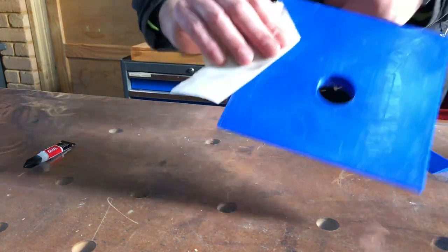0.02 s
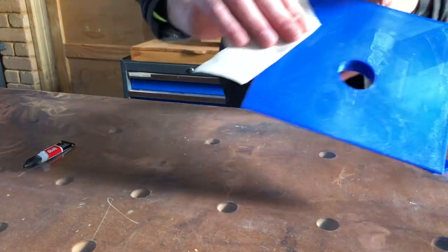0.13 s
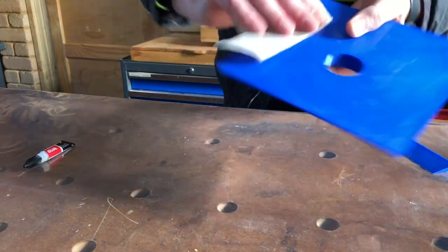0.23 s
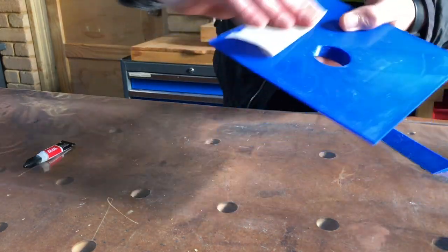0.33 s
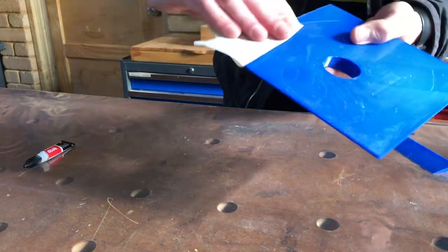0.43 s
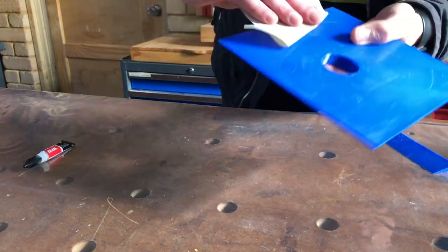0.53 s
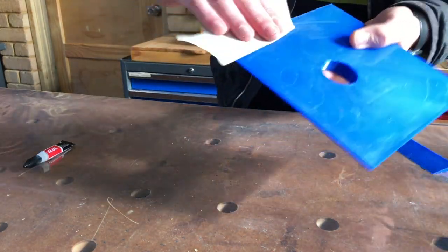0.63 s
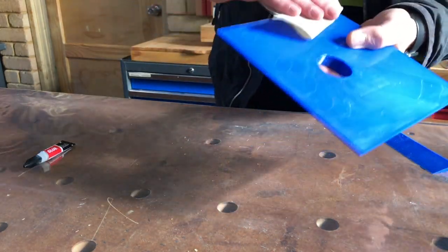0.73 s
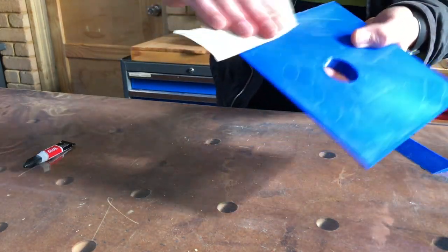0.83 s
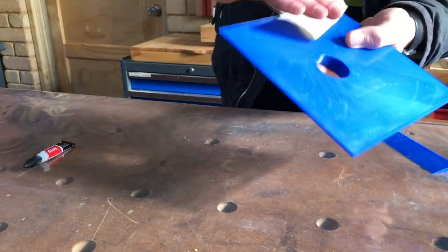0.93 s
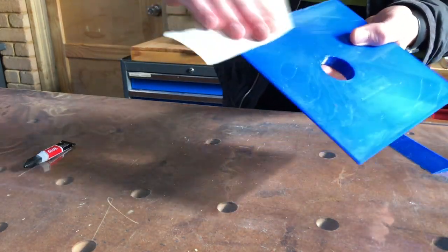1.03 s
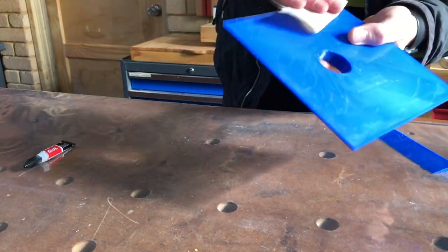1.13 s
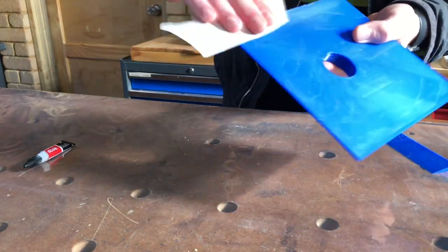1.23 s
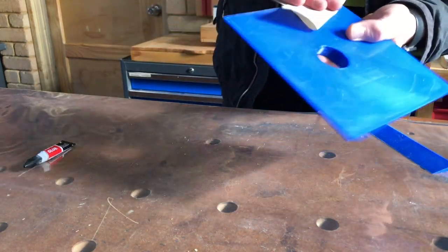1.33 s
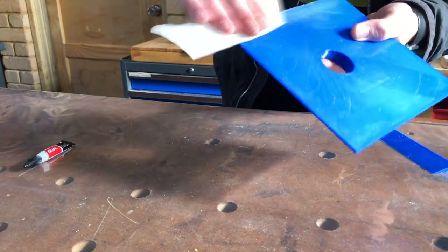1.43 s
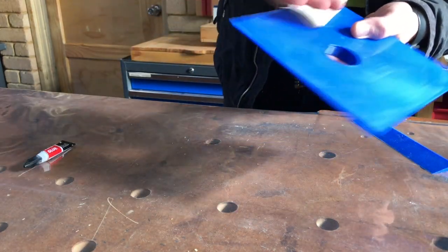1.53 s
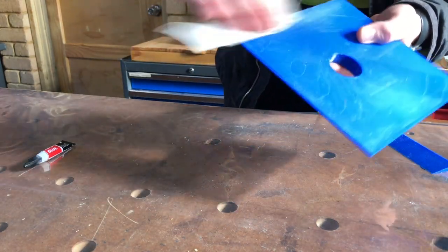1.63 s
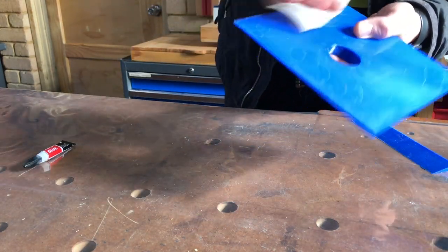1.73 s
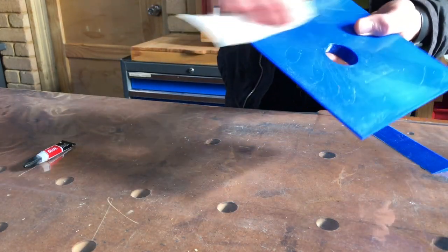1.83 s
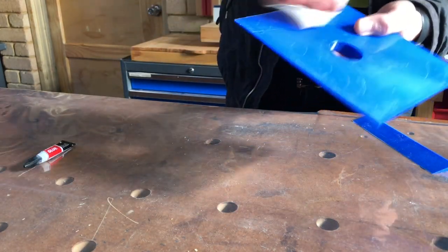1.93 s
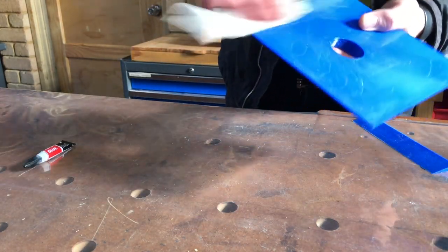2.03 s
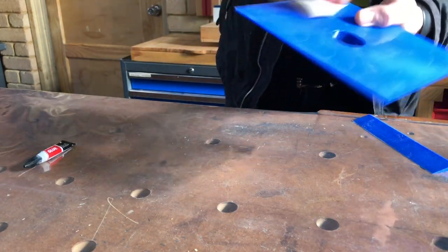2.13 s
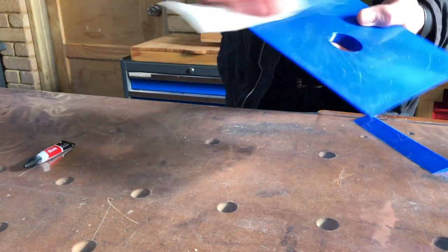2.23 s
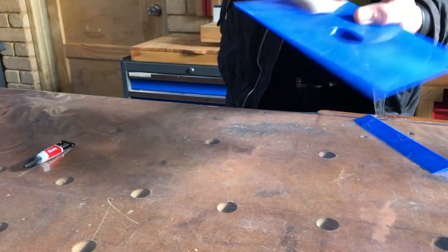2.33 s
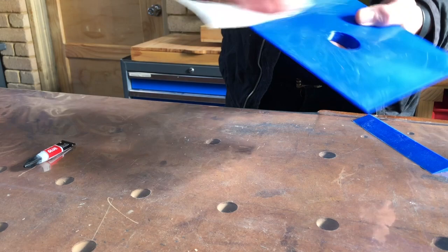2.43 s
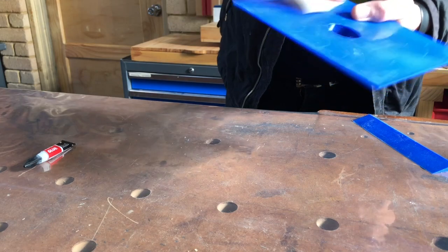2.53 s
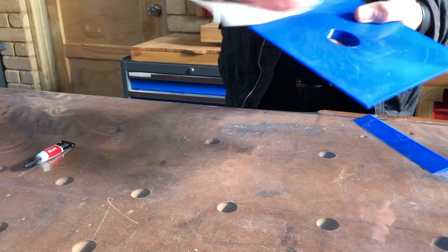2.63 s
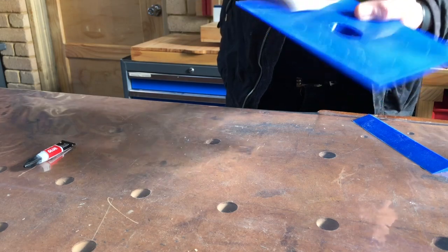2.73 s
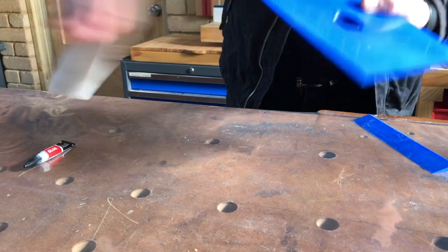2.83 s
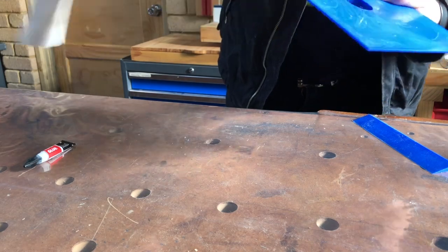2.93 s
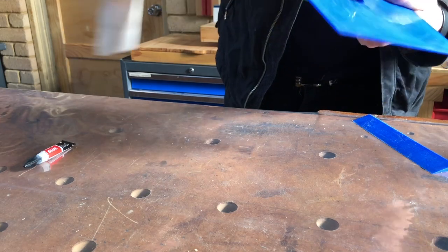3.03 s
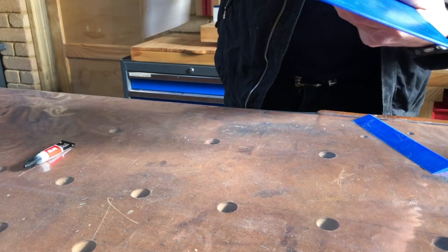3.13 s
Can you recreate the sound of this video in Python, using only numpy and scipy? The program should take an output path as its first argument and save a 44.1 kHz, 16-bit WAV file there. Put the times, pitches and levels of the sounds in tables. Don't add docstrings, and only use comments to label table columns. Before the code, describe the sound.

Sandpaper rubbed quickly by hand back and forth on a hard plastic plate, bright and raspy

```python
import sys
import numpy as np
from scipy import signal
from scipy.fft import rfft, irfft
from scipy.io import wavfile
from scipy.ndimage import uniform_filter1d

SR = 44100
rng = np.random.default_rng(int(sys.argv[2]) if len(sys.argv) > 2 else 0)


def magnitude_from_level(level_db):
    exponent = np.asarray(level_db, float) / 20
    return 10 ** exponent


def waveform_to_disk(signal):
    frames = np.transpose(np.atleast_2d(signal))
    scaled = np.clip(frames, -1, 1) * 32767
    samples = np.round(scaled).astype(np.int16)
    wavfile.write(sys.argv[1], SR, samples)


N = 138915


def evened(x):
    return x / np.sqrt(np.mean(x ** 2) + 1e-20)


def drift(noise, size):
    return evened(uniform_filter1d(uniform_filter1d(noise, size=size), size=size))


def read(points, hz):
    f, value = np.transpose(points)
    return np.interp(np.log(hz + 1), np.log(f + 1), value)


def curve(points, column=1):
    return np.interp(np.arange(N) / SR, [p[0] for p in points], [p[column] for p in points])


def colour(x, points):
    return irfft(rfft(x) * magnitude_from_level(read(points, np.fft.rfftfreq(N, 1 / SR))), N)


def highpass(x, order, hz):
    return signal.sosfilt(signal.butter(order, hz, "high", fs=SR, output="sos"), x)


def add(mix, s, sound):
    part = mix[round(s * SR):][:len(sound)]
    part += sound[:len(part)]


def resonate(x, hz, width):
    turn = np.exp(2j * np.pi * np.cumsum(hz * np.ones(len(x))) / SR)
    r = np.exp(-np.pi * abs(width) / SR)
    return 2 * (turn * signal.lfilter([1 - r], [1, -r], x / turn)).real


def hum_band(x, hz, width):
    return evened(resonate(resonate(x, hz, width), hz, width))


def background():
    # f/Hz, level/dB
    air_colour = [(40, -35), (80, 4), (180, -9.5), (400, -5), (1000, -4.5), (3000, -10.5), (8000, -18),
                  (16000, -33)]
    # t/s, level/dB
    air_level = [(0, -57.5), (.09, -63), (.18, -56.5), (.5, -65), (2.9, -63.5), (3.15, -76)]
    # t/s, f/Hz, first line level/dB, second line level/dB
    motor = [(0, 87.3, -73, -64.5), (.17, 88, -61, -67), (.5, 89.14, -64.5, -76.5), (.86, 88.86, -84, -76),
             (1.12, 90.2, -62, -73.5), (1.33, 89.98, -78, -80.5), (1.55, 91.14, -69.5, -79),
             (2.3, 93.03, -81.5, -84.5), (2.9, 95, -77.5, -80), (3.15, 97.6, -71, -75)]
    a, b, c = rng.standard_normal((3, N))
    air = np.array([colour(a, air_colour), colour(b, air_colour)])
    air = magnitude_from_level(curve(air_level)) * air / np.std(air[0])
    hz = curve(motor)
    for k in (1, 2):
        tone = np.sqrt(2) * np.sin(2 * np.pi * k * np.cumsum(hz) / SR)
        line = tone + 0.5 * evened(resonate(c, k * hz, 2.6))
        air[0] += magnitude_from_level(curve(motor, column=k + 1)) * line
    return air


def paper_snaps():
    # t/s, level/dB, lowest f/Hz, time to fall 60 dB/s
    snaps = [(.05, -66, 11700, .012), (.066, -70, 8500, .01), (.08, -67, 11500, .012),
             (0.098, -33, 1370, 0.012), (0.1014, -45, 2320, 0.02), (.137, -64, 11000, .015),
             (2.838, -47, 700, 0.012), (2.833, -47, 2500, 0.034)]
    out, t = np.zeros(N), np.arange(4000) / SR
    for s, db, hz, t60 in snaps:
        burst = highpass(rng.standard_normal(len(t)), 4, hz)
        ring = 8.7 * resonate(burst, 1.44 * hz, 0.51 * hz)
        add(out, s, magnitude_from_level(db - 60 * t / t60) * (burst + ring) * np.minimum(t / 0.00023, 1))
    return out


def finger_knocks():
    # t/s, level/dB, f/Hz, time to fall 60 dB/s
    knocks = [(0.194, -35, 219, 0.06), (.203, -33, 290, 0.029), (.225, -40, 760, 0.11),
              (1.29, -46, 740, 0.066), (1.49, -46, 741.2, .05), (0.097, -40, 507, 0.064),
              (.599, -39, 706, 0.018), (.797, -62, 580, 0.018), (1.196, -48, 503, 0.037),
              (1.393, -50, 490, 0.037), (1.578, -48, 397.3, 0.024), (1.66, -43, 797.6, 0.08),
              (1.763, -37.5, 800, 0.037), (2.07, -42, 743, 0.073), (2.365, -53, 346, 0.046),
              (2.834, -42, 528.7, 0.047), (2.879, -44.5, 312.4, 0.045), (3.136, -46, 295, 0.027),
              (0.411, -45, 516, 0.06)]
    out, t = np.zeros(N), np.arange(4000) / SR
    for s, db, hz, t60 in knocks:
        swing = np.sin(2 * np.pi * hz * t) * min(250 / hz, 1)
        puff = hz / 600 * hum_band(rng.standard_normal(len(t)), 1.58 * hz, 2.0 * hz)
        rise_s = 0.0073 if hz > 730 else 0.0024
        add(out, s, magnitude_from_level(db - 60 * t / t60) * (swing + puff) * np.minimum(t / rise_s, 1))
    return out


def hand():
    # start t/s, length/s, pressure level/dB, ridge f/Hz at full speed
    strokes = [(.21, 0.13, -31, 1420), (.354, 0.108, -30.5, 1420), (.499, 0.066, -26.5, 1695),
               (.598, 0.081, -29, 1613), (.696, 0.076, -25, 2450), (.8, 0.087, -27, 2508),
               (.9, 0.076, -25.5, 2695), (1.002, 0.082, -27.5, 3050), (1.099, 0.073, -26, 3157),
               (1.201, 0.084, -28, 3055), (1.297, 0.067, -26.5, 3153), (1.392, 0.078, -27.5, 3500),
               (1.484, 0.068, -26.5, 3685), (1.579, 0.075, -28, 3710), (1.673, 0.074, -28, 3530),
               (1.765, 0.084, -28, 3500), (1.863, 0.079, -26, 3592), (1.965, 0.089, -28, 3584),
               (2.066, 0.08, -26.5, 4050), (2.166, 0.094, -28, 3706), (2.272, 0.076, -26.5, 4150),
               (2.366, 0.084, -28, 3860), (2.47, 0.071, -26.5, 3828), (2.563, 0.083, -28.5, 3800),
               (2.661, 0.077, -26.5, 3600), (2.759, 0.075, -27.5, 4924)]
    # fastest t/s, speed at start/share, speed at end/share
    arches = [(.3, 0.96, .95), (.4, 0.85, 0.88), (.53, 0.73, 0.75), (.632, 0.49, .5), (.74, .6, .45),
              (.84, 0.61, .7), (.935, 0.59, .5), (1.062, .64, .88), (1.142, 0.71, 0.53), (1.236, .5, .75),
              (1.335, 0.74, 0.44), (1.425, 0.46, 0.77), (1.522, .75, 0.44), (1.617, 0.41, .8),
              (1.713, 0.71, 0.5), (1.802, 0.48, .75), (1.91, 0.63, 0.46), (2.005, .45, .55),
              (2.113, 0.66, 0.54), (2.2, .48, 0.74), (2.315, 0.51, 0.41), (2.403, .42, 0.59),
              (2.515, 0.63, 0.42), (2.6, .36, .45), (2.705, .65, .48), (2.83, 0.35, .98)]
    # level/dB, clearest t/s, half length/s
    catches = [(-12, 0.309, .02), (-14, 0.37, .05), (-13, 0.486, 0.023), (-12, 0.651, 0.022),
               (-27, 0.73, .03), (-12.5, .845, 0.023), (-21, .935, 0.017), (-8, 1.044, 0.021),
               (-10.5, 1.148, .018), (-10, 1.22, 0.016), (-10.5, 1.338, 0.035), (-9.5, 1.412, 0.027),
               (-9.5, 1.532, 0.028), (-9.5, 1.595, 0.027), (-6, 1.712, 0.01714), (-9.5, 1.788, 0.018),
               (-11, 1.912, 0.06), (-11.5, 1.99, .035), (-6.5, 2.112, 0.0087), (-11, 2.197, 0.021),
               (-7.5, 2.318, 0.018), (-8, 2.4, 0.023), (-11.5, 2.505, 0.0239), (-9, 2.604, 0.03),
               (-14, 2.708, .025), (-3.5, 2.804, 0.018)]
    # rise/s, fall/s, lean from start to end/dB
    pull, push = (.022, .012, 1.3), (.007, .032, -3.5)
    opening, closing = (.012, .01, -2.5), (0.00501, 0.013, -0.74)
    pointed, loose = 1.2, 0.38
    slowest = 0.377
    gain, speed, hz, catch = np.zeros((4, N))
    for k, (s, length, db, top_hz) in enumerate(strokes):
        shape = push if k % 2 else pull
        if k < 2:
            shape = opening
        if k == len(strokes) - 1:
            shape = closing
        rise, fall, lean_db = shape
        top, first, final = arches[k]
        catch_db, clear, half = catches[k]
        t = np.arange(0, length + (rise + fall) / 2, 1 / SR)
        now = t + s - rise / 2
        edge = np.clip(t / rise, 0, 1) * np.clip((t[-1] - t) / fall, 0, 1)
        press = edge * magnitude_from_level(db + lean_db * (t / t[-1] - .5) * 2)
        ends = np.where(now < top, first, final)
        angle = np.interp(now, [now[0], min(top, now[-2]), now[-1]], [0, np.pi / 2, np.pi])
        v = ends + (1 - ends) * abs(np.sin(angle)) ** pointed
        sing = magnitude_from_level(catch_db) * (loose + (1 - loose) * np.exp(-.5 * ((now - clear) / half) ** 2))
        for mix, part in zip((gain, speed, hz, catch), (press, v, v * top_hz, sing)):
            span = mix[round(now[0] * SR):][:len(t)]
            span[:] = np.maximum(span, part)
    return gain, np.clip(speed, slowest, 1), np.clip(hz, 300, 5200), catch


def patchy(x):
    z = signal.stft(x, nperseg=256)[2]
    patch = uniform_filter1d(rng.standard_normal(z.shape), size=7, axis=0)
    patch = evened(uniform_filter1d(patch, size=3, axis=1))
    return signal.istft(z * magnitude_from_level(2.5 * patch), nperseg=256)[1][:N]


def grit_crackle(grains, speed, pace):
    # f/Hz, level/dB
    click_colour = [(150, -73), (500, -29.5), (1300, -29), (2300, -6), (6170, -5.5), (10900, -1.5),
                    (13000, -7.5), (16000, -6)]
    # f/Hz, width/Hz, level/dB
    plate = [(2970, 410, -0.5), (5200, 980, 0.5), (7620, 910, -5), (11260, 2300, -0.5), (13660, 1500, 3)]
    grit = colour(grains, click_colour)
    ringing = sum(magnitude_from_level(db) * resonate(grit, f, width) for f, width, db in plate)
    grit = evened(patchy(grit + ringing))
    treble = highpass(grit, 2, 6000) * (speed * pace ** 0.31 - 1)
    thinned = np.clip(0.35 * pace, 0, .9) * resonate(grit, 2280, 1270)
    return grit + treble - thinned


def ridge_song(grains, bed, hz):
    # multiple/times, width/Hz, level/dB
    overtones = [(.5, 240, -20), (1, 370, -4), (2, 1300, -7.5), (3, 2350, -4)]
    # f/Hz, level/dB
    radiate = [(600, -3), (1200, -10.5), (1700, -1.5), (2400, -1.5), (4000, 0), (9000, 3)]
    fuzzy = sum(magnitude_from_level(db) * hum_band(grains, k * hz, width) for k, width, db in overtones)
    phase = 2 * np.pi * np.cumsum(hz) / SR
    slow = magnitude_from_level(1.5) * np.exp(-(uniform_filter1d(hz, size=3000) / 1870) ** 4)
    even = np.sin(phase) + slow * (np.sin(2 * phase) + np.sin(3 * phase))
    return colour((fuzzy + 0.85 * even) * magnitude_from_level(2 * drift(bed, 250)), radiate)


def sanding():
    grains_per_s, grain_spread_db, chatter_db = 16000, 0.96, -0.27
    gain, speed, hz, catch = hand()
    hz = hz * (1 + 0.022 * drift(rng.standard_normal(N), 70))
    pace = uniform_filter1d(hz, size=6000) / 3000
    hit, size = rng.random(N), rng.exponential(1, N)
    sign, bed, wobble = rng.standard_normal((3, N))
    clicks = (hit < grains_per_s / SR) * sign * magnitude_from_level(grain_spread_db * np.minimum(size, 2))
    grains = evened(clicks) + 0.95 * bed
    grit = grit_crackle(grains, speed, pace)
    tones = ridge_song(grains, bed, hz)
    scuff = magnitude_from_level(-26.5) * pace ** -0.99 * hum_band(wobble, 1836, 1340)
    chatter = magnitude_from_level(chatter_db * drift(wobble, 150))
    return gain * chatter * (grit + scuff + catch * tones)


def room(x):
    # f/Hz, time/s
    decay = [(200, 0.66), (1300, 0.79), (3500, 0.56), (9000, 0.56), (15000, .33)]
    taps = np.zeros((6, 30000))
    at = np.arange(200, 29990, 10) + rng.integers(0, 10, (6, 2979))
    np.put_along_axis(taps, at, rng.choice([-1., 1.], at.shape), 1)
    hz, t, z = signal.stft(taps, SR, nperseg=256)
    tail = signal.istft(z * magnitude_from_level(-60 * t / read(decay, hz)[:, None]), SR, nperseg=256)[1]
    tail = tail / np.linalg.norm(tail[0])
    cycles = 7.3 * np.arange(N) / SR + np.arange(3)[:, None] / 3
    turns = np.sqrt(2 / 3) * np.cos(2 * np.pi * cycles)
    wet = signal.fftconvolve(np.tile(x * turns, (2, 1)), tail, axes=1)[:, :N]
    return magnitude_from_level(-9) * wet.reshape(2, 3, N).sum(1)


def narrowed(x):
    halves = np.array([x[0] + x[1], x[0] - x[1]]) / 2
    mid, side = signal.stft(halves, nperseg=1024)[2][:, :512]
    m, s = ((abs(z) ** 2).reshape(32, 16, -1).sum(1) for z in (mid, side))
    strong = uniform_filter1d(s, size=2, axis=1) > magnitude_from_level(2 * -16.5) * uniform_filter1d(m, size=2, axis=1)
    keep = np.repeat(strong, 16, 0)
    lost = signal.istft(np.vstack([side * ~keep, 0 * side[:1]]), nperseg=1024)[1][:N]
    return x - np.array([lost, -lost])


def scene():
    # f/Hz, level/dB
    room_width = [(60, -14.5), (500, -10.5), (2500, -13.5), (4000, -13), (6500, -15), (9000, -2),
                  (10500, -17.5), (15000, -28)]
    # f/Hz, level/dB
    near_width = [(300, -19), (2000, -25.5), (3300, -22), (5200, -22), (7500, -16.5), (9000, -12),
                  (10500, -12.5), (15000, -19.5)]
    # f/Hz, level/dB
    lean = [(250, 0.54), (1100, 0.79), (2500, -0.17), (4970, 0.15), (8500, 2), (15000, -0.4)]
    behind = background()
    small = paper_snaps() + finger_knocks()
    rub = sanding()
    near = rub + small
    far = room(rub + magnitude_from_level(-5) * small) + behind
    sway = magnitude_from_level(4 * drift(rng.standard_normal(N), 1500))
    bounce = np.roll(near, 2) * sway
    mid = near + far[0]
    side = colour(far[1], room_width) + colour(bounce, near_width)
    left_lean = [(f, db / 2) for f, db in lean]
    right_lean = [(f, -db / 2) for f, db in lean]
    return np.array([colour(mid + side, left_lean), colour(mid - side, right_lean)])


def low_pass(x):
    return signal.sosfilt(signal.butter(12, 16900, fs=SR, output="sos"), x)


def record(dry):
    cut = highpass(dry, 2, 64)
    lowpass = signal.firwin(511, 15850, window=("kaiser", 9), fs=SR)
    cut = signal.oaconvolve(cut, lowpass[None], "same")
    mix = narrowed(cut)
    return low_pass(mix)


dry = scene()
out = record(dry)
waveform_to_disk(out)
```